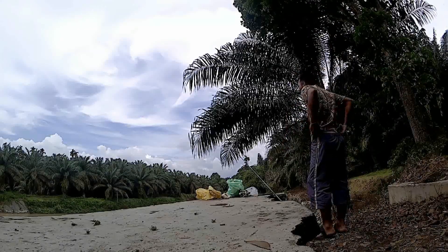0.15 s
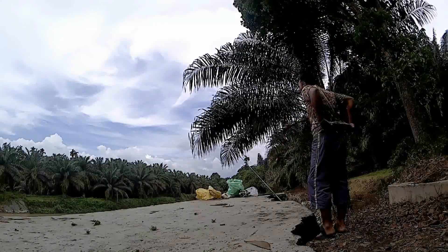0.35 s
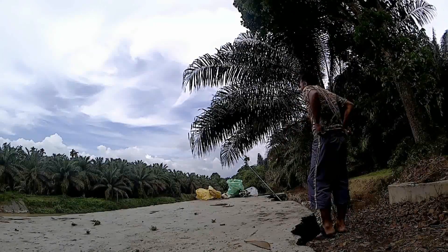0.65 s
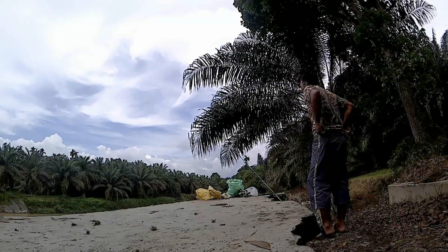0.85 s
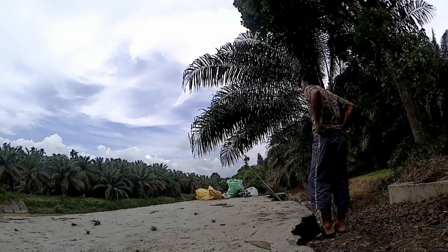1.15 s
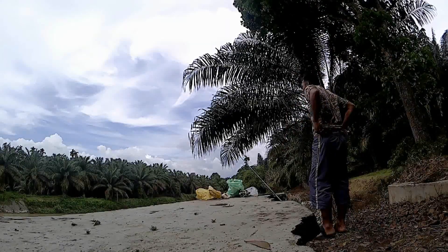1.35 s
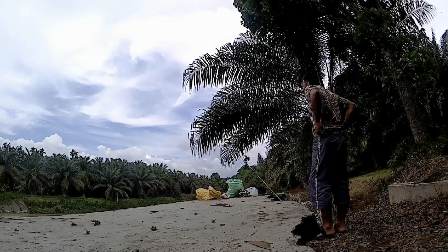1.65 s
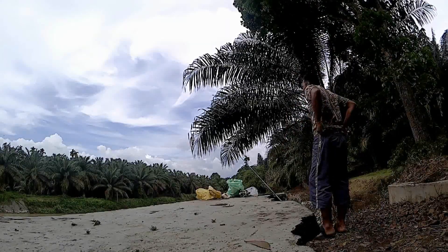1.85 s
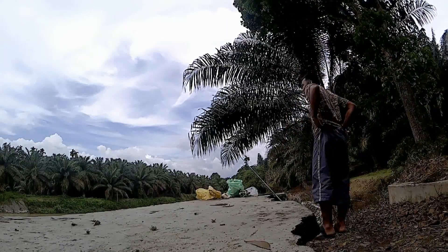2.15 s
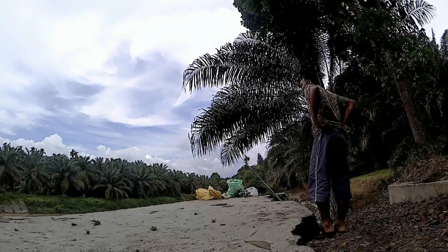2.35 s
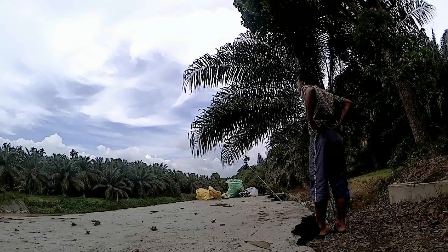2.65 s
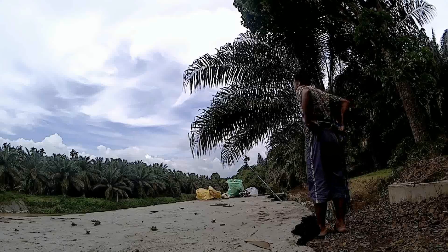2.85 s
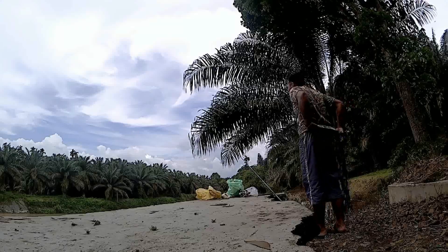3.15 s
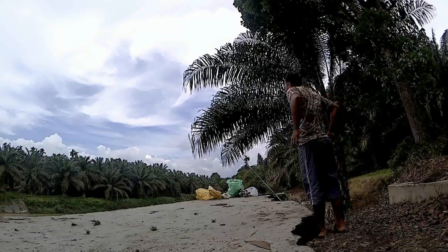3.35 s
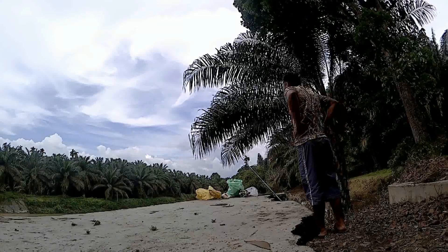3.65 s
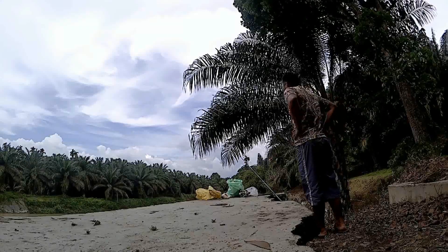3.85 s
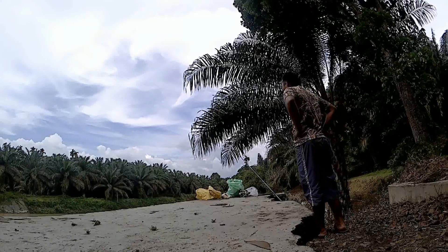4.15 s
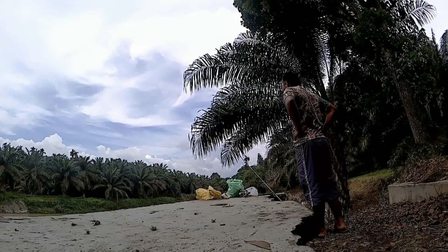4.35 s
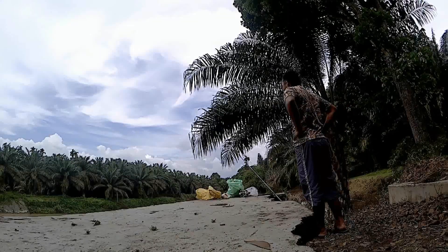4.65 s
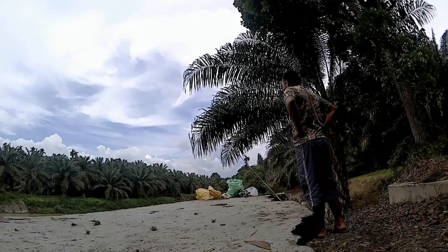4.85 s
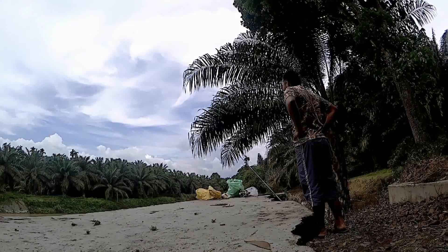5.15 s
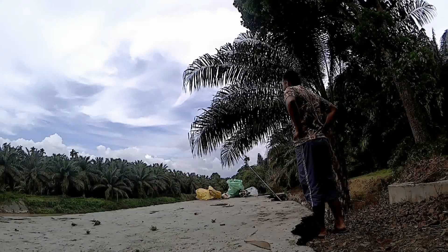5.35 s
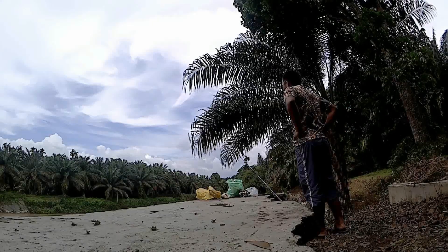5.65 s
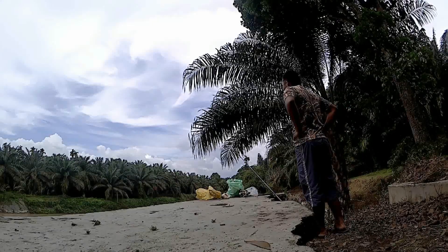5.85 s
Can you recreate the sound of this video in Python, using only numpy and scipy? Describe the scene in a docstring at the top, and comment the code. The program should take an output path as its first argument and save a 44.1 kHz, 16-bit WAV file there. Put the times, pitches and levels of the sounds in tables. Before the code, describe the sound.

A continuous, bass-heavy rush of ditch water gurgles and surges slightly, its channel booming hollowly beneath dull foam and faint metallic hiss.

```python
"""Rushing ditch water

Water rushes steadily through an open ditch channel: a low churn, roaring rapids and hissing foam.
The rush is noise in flickering bands, the bubbles are a dense crowd of short rising rings, and the
hollow boom of the channel is narrow resonant noise. The banks add a short faint echo.
A small mono camera with a low sample rate dulls the sound and adds a thin glassy hiss."""
import sys
import numpy as np
from scipy import signal
from scipy.fft import rfft, irfft
from scipy.io import wavfile

SR = 44100
rng = np.random.default_rng(int(sys.argv[2]) if len(sys.argv) > 2 else 0)


def store_pcm(level_fs):
    """Save levels as 16-bit WAV."""
    pcm = np.round(np.clip(level_fs, -1, 1) * 32767).astype(np.int16)
    wavfile.write(sys.argv[1], SR, np.atleast_2d(pcm).T)


N = 265041
TIME = np.arange(N) / SR
BINS = np.maximum(np.arange(N // 2 + 1), 1) * SR / N  # spectrum frequencies in Hz, kept above zero
CAMERA_HZ = 8000  # sample rate of the camera


def undb(db):
    """Decibels to gain."""
    return 10 ** (np.asarray(db) / 20)


def level(x, db):
    """The sound at a given rms level."""
    return x * undb(db) / np.sqrt(np.mean(x ** 2))


def noise(gain):
    """Noise with the given gain at each frequency."""
    return irfft(rfft(rng.standard_normal(N)) * gain, N)


def walk(rate_hz):
    """A smooth random drift of rms 1, made of noise mostly slower than rate_hz."""
    return level(noise(np.exp(-(BINS / rate_hz) ** 2)), 0)


def water_gain(hz):
    """Colour of the turbulent flow: its gain at each frequency, dying away below the lowest point."""
    # spectrum of the flow: pitch_hz, relative_level_db
    flow_colour = [(12, -20), (22, -8), (60, -7.5), (80, -5), (130, -2.5), (300, -3), (580, -5.5),
                   (800, -7.5), (1000, -11), (1170, -14.2), (1790, -14.5), (2070, -20.5), (2330, -22),
                   (2700, -20), (3130, -23.5), (3500, -29.5), (3780, -32), (4000, -32)]
    points_hz, points_db = np.transpose(flow_colour)
    colour_db = np.interp(np.log(hz), np.log(points_hz), points_db)
    return undb(colour_db) * np.minimum(hz / points_hz[0], 1)


def surges(rise_s=0.088, fall_s=0.11, drift_hz=3.4):
    """Swells in dB: plunging water moves churn, gurgle and rapids; the foam follows its own curve."""
    # plunges of water, negative where a layer dips: crest_s, churn_swell_db, gurgle_swell_db, rapids_swell_db
    plunges = [(0.19, 1, 3, 3.5), (0.42, 1, 2.5, 1.5), (0.89, 2.2, 2, 0), (1.17, 2.8, 2.3, 2.5),
               (1.41, 4.5, 1, 0.5), (1.62, 3.2, -2, 0), (1.82, 4, -1.5, 0), (1.94, -1, 0.5, 2),
               (2.18, 1.8, -2, 1), (2.7, 4, 1, 1), (2.83, 0, 3, -0.5), (2.98, 1.5, 4, 2.5),
               (3.17, 3.5, 4.5, -0.5), (3.33, 5.5, 0, 0.5), (3.63, 1, 1.7, 1), (3.84, 1.5, 0, -1),
               (4.39, 0, 5.5, 1), (4.56, 0, 2, -2), (4.77, 3.8, 2, 1), (4.9, -1.5, 2.3, 2),
               (5.15, 1.5, 4, 2), (5.31, 4, 3.5, 1), (5.62, 4, .3, 0)]
    # swell of the foam before its random drift: time_s, swell_db
    foam_swell = [(0, 0.4), (0.7, 0.4), (1.4, 0.1), (1.8, 0.8), (2.15, -0.2), (2.5, 1), (2.85, -1),
                  (3.0, 0.4), (3.25, -.7), (3.9, 0.2), (4.75, -0.8), (4.95, 0.2), (5.4, -.4), (6.0, 0.2)]

    # starting balance; gurgle and rapids share one random drift
    drift_db = 0.18 * walk(drift_hz)
    churn_db = 1.42
    gurgle_db = -0.22 + drift_db
    rapids_db = -0.13 + drift_db
    for crest_s, churn_swell_db, gurgle_swell_db, rapids_swell_db in plunges:
        swell = np.interp(TIME - crest_s, [-rise_s, 0, fall_s], [0, 1, 0])
        churn_db = churn_db + churn_swell_db * swell
        gurgle_db = gurgle_db + gurgle_swell_db * swell
        rapids_db = rapids_db + rapids_swell_db * swell

    foam_db = np.interp(TIME, *np.transpose(foam_swell)) + 0.07 * walk(drift_hz)
    return churn_db, gurgle_db, rapids_db, foam_db


def rush(churn_db, gurgle_db, rapids_db, foam_db, flicker_db=0.63, flicker_hz=14.0, count=18, rush_db=-22):
    """Turbulence in half-octave bands: big eddies sound low, foam high, and each size flickers alone."""
    octaves = np.linspace(np.log2(10), np.log2(CAMERA_HZ / 2), count)
    colour = water_gain(BINS)
    # the deepest rumble flickers but has no surge
    swells_db = (0, churn_db, gurgle_db, rapids_db, foam_db)
    edges_hz = [70, 300, 600, 1000]  # where each swell gives way to the next

    out = 0
    for octave, share in zip(octaves, np.eye(count)):
        # neighbouring bands crossfade in power
        crossfade = np.sqrt(np.interp(np.log2(BINS), octaves, share))
        band = noise(colour * crossfade)
        swell_db = swells_db[np.searchsorted(edges_hz, 2 ** octave)]
        out = out + band * undb(swell_db + flicker_db * walk(flicker_hz))
    return level(out, rush_db)


def bubbles(foam_db, low_hz=378.0, high_hz=3307.0, cycles=13.0, glide=0.025, spread_db=17, count=3200,
            bubbles_db=-38):
    """Trapped air rings briefly; the pitch of each bubble climbs as it nears the surface."""
    out = np.zeros(N)
    for when, smallness, distance, life in rng.random((count, 4)):
        hz = low_hz * (high_hz / low_hz) ** smallness
        decay_s = cycles * (.5 + life) / hz  # small bubbles die sooner
        start = int(when * N)
        t = TIME[:min(int(5 * decay_s * SR), N - start)]

        # the pitch rises by the share glide in each decay time
        phase = 2 * np.pi * hz * t * (1 + glide * t / decay_s / 2)
        ring = np.sin(phase) * np.exp(-t / decay_s)
        # strength grows with pitch, follows the colour of the flow and fades with distance
        strength = hz * water_gain(hz) * undb(-spread_db * distance)
        out[start:start + len(t)] += ring * strength
    return level(out * undb(foam_db), bubbles_db)


def banks(x, decay_s=0.027, echo_db=-19):
    """The banks of the ditch scatter a short faint echo, which ripples the colour of the rush."""
    tail = rng.standard_normal(N) * np.exp(-TIME / decay_s)
    echo = signal.fftconvolve(x, tail / np.linalg.norm(tail))[:N]
    return x + undb(echo_db) * echo


def hollow(hz, width_hz, wander=0.04, wander_hz=2.004):
    """One resonance stirred by turbulence; its pitch wanders as the water heaves."""
    ring = noise(1 / (1 + (2 * (BINS - hz) / width_hz) ** 2))
    # reading the ring at an uneven speed bends its pitch; wander is the rms share
    place = np.cumsum(1 + wander * walk(wander_hz))
    return np.interp(place % N, np.arange(N), ring)


def boom(churn_db):
    """The tumbling water keeps the hollow resonances of the channel ringing."""
    # channel resonances: centre_hz, width_hz, rms_level_db (before any swell)
    resonances = [(45, 17, -35), (111.3, 31, -40.5), (156, 23, -41), (221.5, 45, -41)]
    rings = [level(hollow(hz, width_hz), db) for hz, width_hz, db in resonances]
    # the deepest one has no swell, the others swell with the churning
    return rings[0] + sum(rings[1:]) * undb(churn_db)


def scene():
    """Rushing water and its bubbles between the banks, and the boom of the channel."""
    churn_db, gurgle_db, rapids_db, foam_db = surges()
    water = rush(churn_db, gurgle_db, rapids_db, foam_db) + bubbles(foam_db)
    return (banks(water) + boom(churn_db))[None]


def record(dry, oversample=4, top_hz=10950):
    """The camera joins its slow samples by straight lines, mirroring the sound faintly into the treble."""
    coarse = signal.resample_poly(dry[0], CAMERA_HZ, SR, window=("kaiser", 2))
    # draw the lines at a higher rate, then return to the output rate
    fine_time = np.arange(N * oversample) / (SR * oversample)
    joined = np.interp(fine_time, np.arange(len(coarse)) / CAMERA_HZ, coarse)
    mirrored = signal.resample_poly(joined, 1, oversample)
    # steep treble cutoff: 0.1 dB ripple below it, 80 dB down above
    top = signal.ellip(12, .1, 80, top_hz, fs=SR, output="sos")
    return signal.sosfilt(top, mirrored)[None]


dry = scene()
out = record(dry)
store_pcm(out)
```